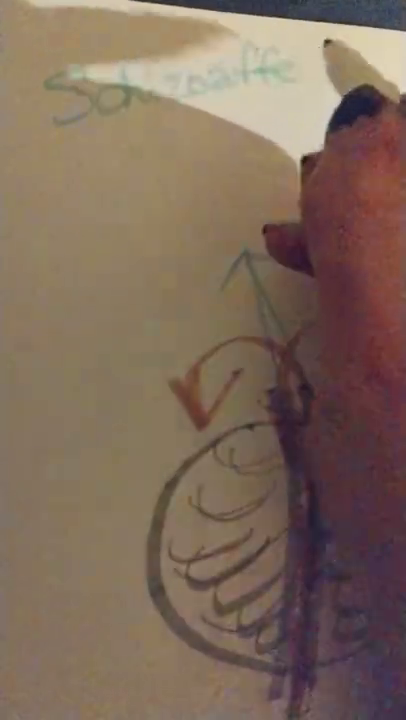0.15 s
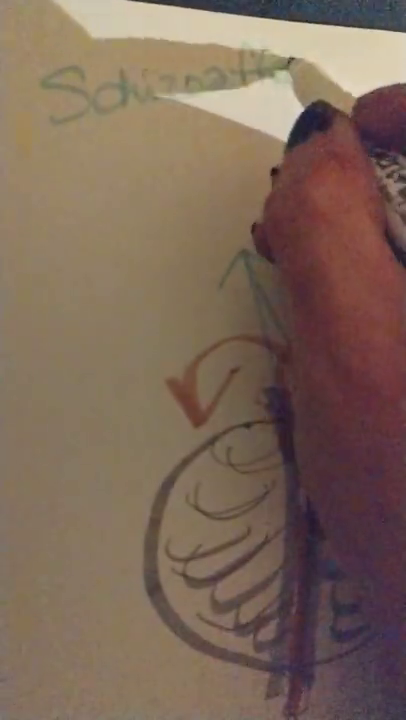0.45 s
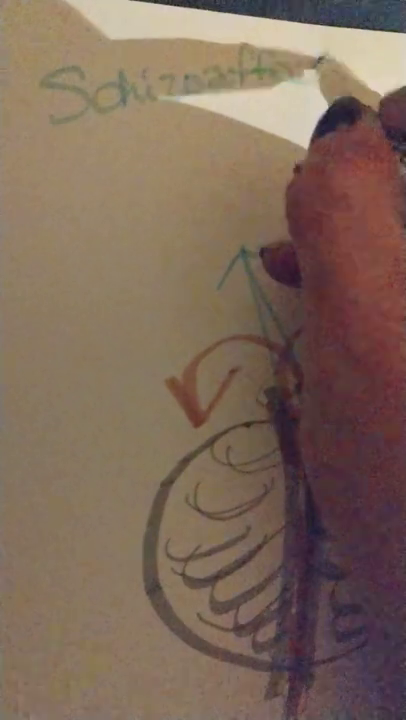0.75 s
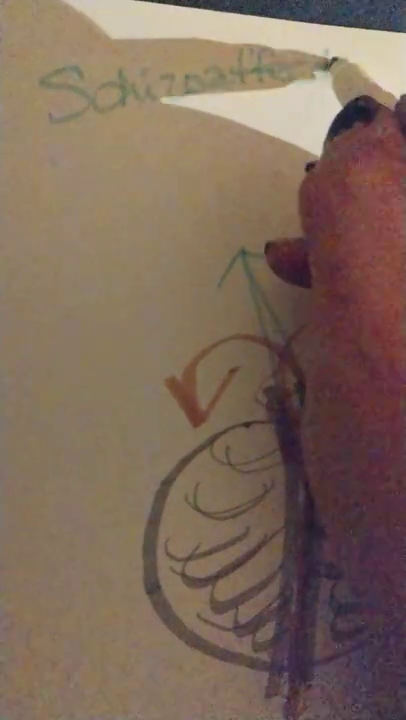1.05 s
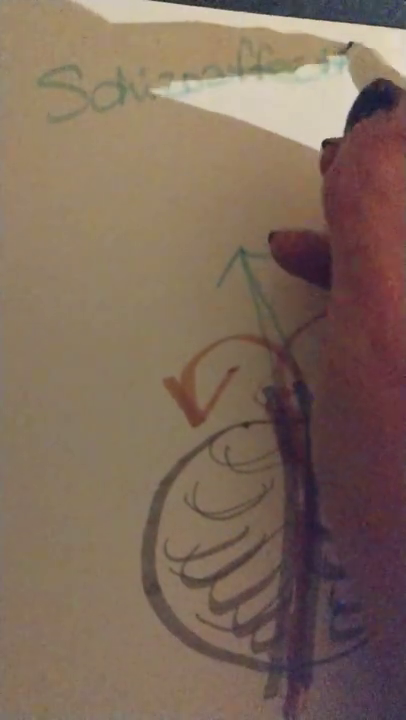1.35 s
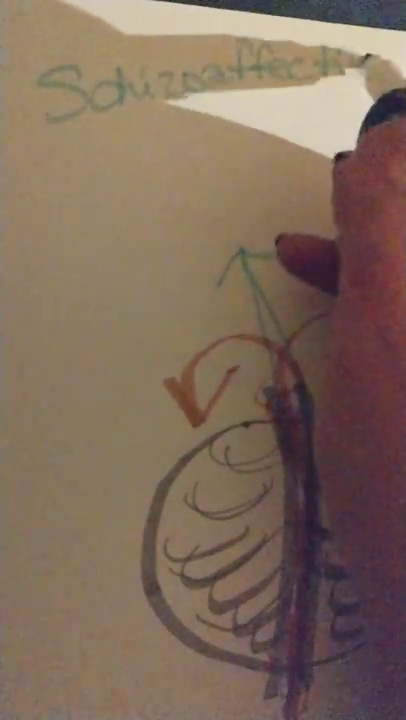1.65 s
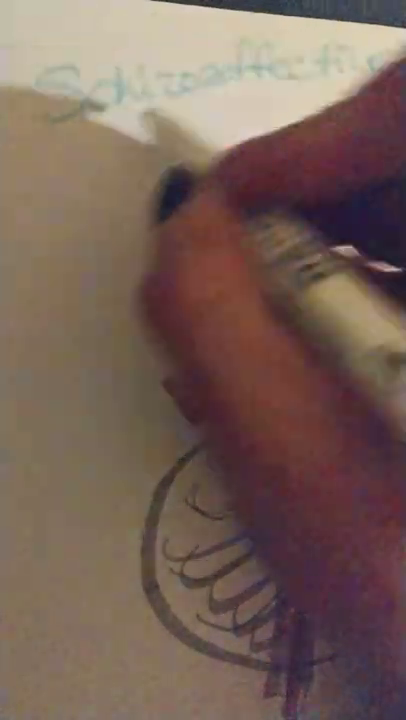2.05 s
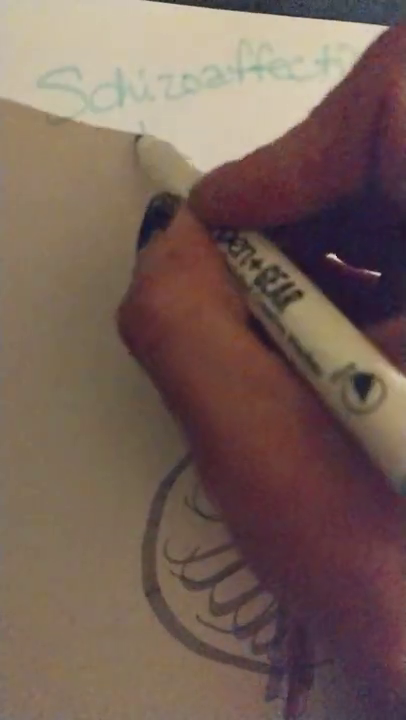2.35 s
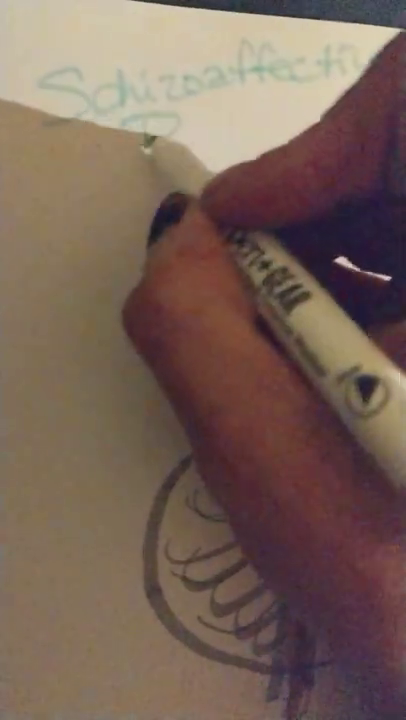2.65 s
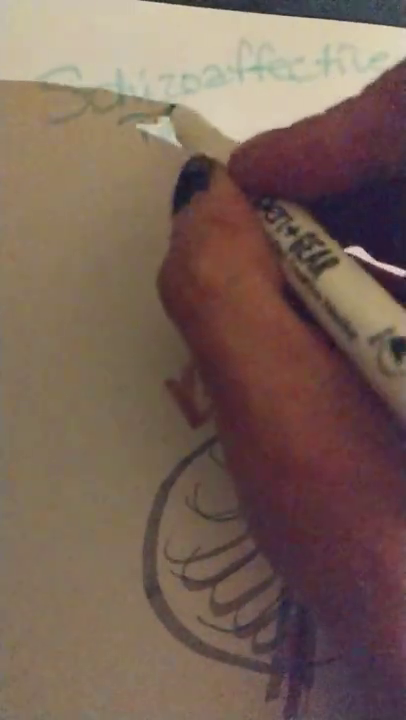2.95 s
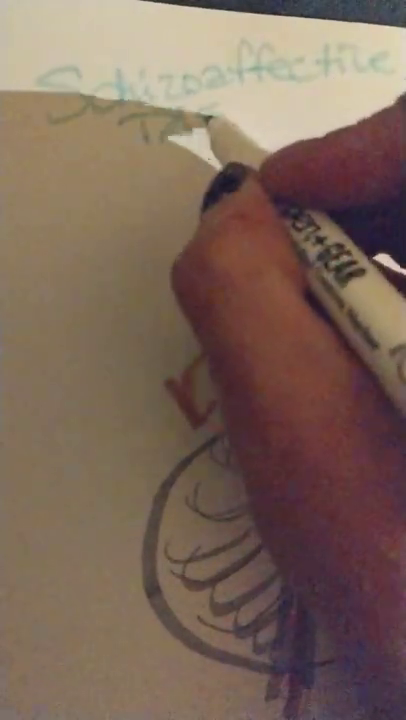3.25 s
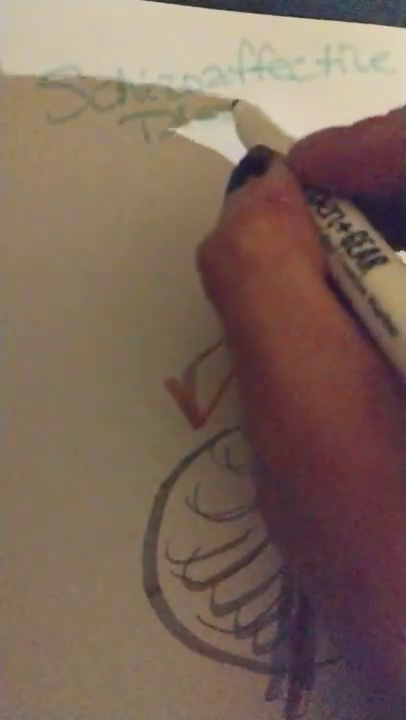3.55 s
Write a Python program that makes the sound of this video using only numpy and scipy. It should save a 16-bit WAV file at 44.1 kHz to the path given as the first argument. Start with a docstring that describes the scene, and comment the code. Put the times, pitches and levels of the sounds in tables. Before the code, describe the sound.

A felt marker writes on paper in quick, high, scratchy strokes.

```python
"""Short, high scratches come first: a felt marker writes letters on paper on a desk, close on the left.
In each stroke the nib catches and slips on the fibres, faster and harder in mid-stroke; the scratch
peaks near 9 kHz. Now and then the nib snags with a click or squeaks faintly. Between strokes come
a faint smooth sliding and a few soft bumps on the desk, over a quiet humming room."""
import sys
import numpy as np
from scipy import signal
from scipy.fft import rfft, irfft
from scipy.io import wavfile

SR = 44100
rng = np.random.default_rng(int(sys.argv[2]) if len(sys.argv) > 2 else 0)


def transcribe(signal):
    """Save signal, clipped to [-1, 1], as a 16-bit WAV file at the path in sys.argv[1]."""
    frames = np.atleast_2d(signal).T
    limited = np.clip(frames, -1, 1)
    pcm = np.round(limited * 32767).astype(np.int16)
    wavfile.write(sys.argv[1], SR, pcm)


N = 163170
COLOUR_HZ = np.fft.rfftfreq(1024, 1 / SR)  # the frequencies at which a tone colour is set
NIB_DB, NIB_WIDTH_HZ = 5.5, 340  # height and half-width of the peak where the nib rings
SLIPS_PER_S, SLIP_SPREAD_DB, SLIP_DECAY_S = 1300, 2.5, 0.00052

# The tone colour of the scratch. Each row: frequency in Hz, relative left and right levels in dB.
SCRATCH_COLOUR = [(304, -61, -46), (1510, -31.5, -38.5), (2550, -35.5, -34.5), (3280, -28.5, -34),
                  (3920, -27.5, -29), (5640, -29.5, -34), (6210, -12.5, -26), (6500, -12.5, -20.5),
                  (7420, -8, -24), (8100, -3.5, -25), (8540, 1, -20.5), (9200, 2, -26), (10070, 1, -37),
                  (10320, -6, -26), (10900, -2.5, -32), (11490, -8, -50), (12340, -14, -40),
                  (13600, -21.5, -42), (15800, -39.5, -46.5)]
# The pen strokes. Each row: time of top speed, time speeding up and time slowing down in seconds,
# level in dB, nib pitch in Hz, extra ring in dB, brightness in dB per octave, right-side boost in dB.
PEN_STROKES = [(0.001, 0.01, 0.029, -49, 9160.0, -9, 0.5, 7), (0.11, 0.064, 0.019, -35.5, 9400, 0, 2, 1.5),
               (0.219, 0.074, 0.071, -48.0, 9400, -5, 4, 7),
               (0.451, 0.0096, 0.021, -59.5, 9260.0, -2.0, -1, 6),
               (0.546, 0.011, 0.03, -38.0, 9250.0, 0, -1, 4),
               (0.655, 0.039, 0.062, -32.0, 9440, -0.5, 2.5, 2),
               (0.752, 0.014, 0.029, -46.5, 9600, -1, 1, 1),
               (0.943, 0.015, 0.03, -57, 9450.0, -3, -1, -0.8),
               (0.977, 0.012, 0.031, -53.5, 9450.0, -5, -2, -0.3),
               (1.066, 0.021, 0.014, -37.0, 9100, 3, -1.0, 3),
               (1.087, 0.013, 0.035, -37.0, 9240, 0.0, 0, 4.5),
               (1.34, 0.011, 0.028, -46.5, 9400.0, -3.0, 7, -0.1),
               (1.403, 0.015, 0.048, -41.0, 9700, 1.0, 4, 2), (1.603, 0.041, 0.019, -43, 9500, 3, -4, 2),
               (1.766, 0.026, 0.035, -38.5, 9100, 3, 2, 2.5),
               (1.845, 0.0094, 0.032, -35, 9240, -3.5, 0, -1),
               (1.94, 0.039, 0.044, -33, 9300, -1.5, 0.3, -1.5),
               (2.469, 0.013, 0.013, -61.0, 8960.0, 2.0, 0.4, -1.9),
               (2.542, 0.005, 0.019, -43, 8580, 5, -8, -1.9),
               (2.596, 0.013, 0.032, -28.5, 8760, 7.5, -0.5, 4),
               (2.624, 0.032, 0.069, -27.5, 8930, 2, 1.5, 2),
               (2.732, 0.055, 0.037, -41.5, 9400, -8, -3, 4.5),
               (2.824, 0.053, 0.038, -40, 9220, -6, 0.0, 4.5),
               (2.983, 0.021, 0.0096, -52.5, 9220.0, 3, -8, 6),
               (3.073, 0.014, 0.012, -46, 8600, 3.5, -8, -3.7),
               (3.109, 0.0097, 0.012, -43.5, 9440.0, 4, -3.0, 2),
               (3.222, 0.031, 0.031, -31.0, 8800, 0.5, -1, 0),
               (3.313, 0.041, 0.034, -37.5, 9140.0, 0, -3, 3),
               (3.394, 0.025, 0.019, -33.5, 8760, -1.0, -4, 1),
               (3.496, 0.033, 0.013, -46.5, 9130.0, -10, -1.5, 5),
               (3.61, 0.029, 0.05, -37.5, 8860.0, 2.5, -3.5, 4),
               (3.697, 0.028, 0.03, -33.5, 9310.0, 1.5, -4.5, -1.6)]


def stroke(rise, fall, level_db, nib_hz, ring_db, brightness_db, right_db):
    """Uneven slips, each a tiny burst, and a smooth rub make the nib and paper ring."""
    speed = speed_arch(rise, fall)
    n = len(speed)
    chance = rng.random(SR // 2)[:n]
    size, noise = rng.standard_normal((2, SR // 2))[:, :n]
    slips = chance < SLIPS_PER_S * (0.44 + 0.56 * speed) / SR  # a faster nib slips more often
    sizes = amp(SLIP_SPREAD_DB * np.clip(size, -2, 2))
    slip_power = signal.lfilter([1], [1, -np.exp(-2 / (SLIP_DECAY_S * SR))], slips * sizes ** 2)
    rub_power = amp(3) ** 2
    grain = np.sqrt(unit(np.sqrt(slip_power)) ** 2 + rub_power) * noise
    force = speed ** 1.79
    drive = unit(grain * force) * np.sqrt(np.mean(force ** 2))
    nib = nib_peak(nib_hz, NIB_DB + ring_db)
    # Reflections off the desk and hand colour each stroke differently, left and right.
    ripple = np.array([db * wander(len(COLOUR_HZ), 202 / COLOUR_HZ[1]) for db in (2.3, 3)])
    tilt = brightness_db * np.log2(np.maximum(COLOUR_HZ / nib_hz, .5))
    colour = read(SCRATCH_COLOUR, COLOUR_HZ) + nib + tilt + ripple
    return amp([[level_db], [level_db + right_db]]) * ring(drive, colour)


# The nib's snags. Each row: start in seconds, level in dB.
NIB_SNAGS = [(0.6408, -15), (0.6612, -10), (2.6308, -16), (2.6349, -20), (3.3960, -14), (3.4152, -18.5)]


def snag(level_db):
    """The nib catches on a fibre and snaps free: one click, ringing more than the scratch."""
    return ring(amp([level_db]), read(SCRATCH_COLOUR, COLOUR_HZ) + nib_peak(9000, height_db=15))


# The tone colour of the sliding. Each row: frequency in Hz, relative left and right levels in dB.
SLIDE_COLOUR = [(500, -30, -13), (2340, -24, -28), (4100, -29, -26.5), (5770, -21.5, -32),
                (6260, -14.5, -20), (7700, -7, -19), (9000, 0.5, -22), (10100, -3, -29), (10200, -4.5, -22),
                (11200, -9.5, -29), (12400, -10, -31), (13500, -17.5, -46), (15900, -31, -40)]
# The slides. Each row: time of top speed, time speeding up and time slowing down in seconds, level in dB.
PAPER_SLIDES = [(0.049, 0.035, .1, -59), (0.604, .05, 0.071, -55.5), (0.839, 0.032, 0.067, -56.5),
                (1.151, 0.022, 0.082, -60.5), (1.532, .108, 0.12, -59.5), (1.647, 0.026, 0.051, -55),
                (1.85, .068, 0.13, -58.5), (2.026, 0.051, .095, -61), (2.151, .092, 0.034, -57.5),
                (2.355, .017, 0.063, -58), (2.887, .013, 0.066, -58), (3.451, 0.023, 0.022, -56.5),
                (3.549, .036, 0.078, -62), (3.661, .06, 0.035, -51)]


def slide(rise, fall, level_db):
    """Light rubbing over the sheet makes a fine hiss that grows with speed."""
    speed = speed_arch(rise, fall)
    grain = unit(rng.standard_normal(SR) * amp(1.5 * wander(SR, 25)))[:len(speed)]
    return amp(level_db) * ring(grain * speed ** 0.68, read(SLIDE_COLOUR, COLOUR_HZ))


# Soft bumps of hand and pen. Each row: start in seconds, peak level in dB.
DESK_BUMPS = [(1.778, -54), (1.809, -53.5), (1.913, -53), (2.237, -52), (2.318, -49), (2.340, -58),
              (3.064, -47)]


def bump(level_db, pitch_hz=138, rise_s=0.0011, decay_s=0.004):
    """The desk top swings once and settles almost at once."""
    t = np.arange(SR // 20) / SR
    swing = (1 - np.exp(-t / rise_s)) * np.exp(-t / decay_s) * np.sin(2 * np.pi * pitch_hz * t)
    return -amp(level_db) * swing / abs(swing).max()


# The faint squeaks. Each row: start in seconds, length in seconds, pitch in Hz, level in dB.
NIB_SQUEAKS = [(2.278, 0.062, 5900, -75), (2.69, 0.26, 4560, -73)]


def squeak(length, pitch_hz, level_db, waver_hz=90):
    """Slips fall roughly into step for a moment and give a thin, broken tone."""
    swell = speed_arch(length / 2, length / 2)
    drift, grip = (wander(SR, 120)[:len(swell)] for _ in range(2))
    phase = 2 * np.pi * np.cumsum(pitch_hz + waver_hz * drift) / SR
    return amp(level_db) * swell * grip * np.sin(phase)


def room_echo(sound, fade_s=0.13):
    """The small room answers the left channel with a short, faint echo on both sides."""
    t = np.arange(SR // 3) / SR
    tail = rng.standard_normal((2, len(t))) * amp(-60 * t / fade_s) * (t > .002)
    tail = tail / np.linalg.norm(tail[0]) * amp([[-22], [-40]])
    return signal.fftconvolve(sound[:1], tail, axes=1)[:, :N]


# The steady noise. Each row: frequency in Hz, left and right levels in dB per Hz.
NOISE_COLOUR = [(20.4, -118, -118), (45, -102, -89), (71, -95.5, -101), (87.7, -86, -86),
                (123, -85.5, -86.5), (202, -88.5, -87.5), (281, -95, -92.5), (389, -98.5, -91),
                (510, -99, -98.5), (1100, -101, -102), (1670, -107, -108), (1960, -109, -109),
                (2270, -105, -105), (2900, -112, -112), (4200, -112, -112), (4810, -104, -104),
                (5100, -104, -105), (6080, -112, -112), (7560, -108, -113), (8940, -100, -114),
                (9900, -100, -115), (10740, -111, -117), (13100, -117, -119), (15500, -122, -123)]
# How alike its two sides are. Each row: frequency in Hz, likeness (1 the same, 0 unrelated, -1 opposite).
NOISE_LIKENESS = [(60, 0.72), (150, 1), (290, 0.64), (640, -0.25), (1400, -0.36), (3100, 0.33),
                  (15000, -0.3)]


def room_noise():
    """Room rumble, mostly shared by both sides, and microphone hiss, mostly separate."""
    hz = np.fft.rfftfreq(N, 1 / SR)
    left, separate = rfft(rng.standard_normal((2, N)))
    likeness = read(NOISE_LIKENESS, hz)[0]
    right = likeness * left + np.sqrt(1 - likeness ** 2) * separate
    return irfft(np.array([left, right]) * amp(read(NOISE_COLOUR, hz)), N) * np.sqrt(SR / 2)


# The room's hum. Each row: pitch in Hz, left and right levels in dB.
HUM_TONES = [(99.6, -69.5, -69.5), (357.8, -89, -69.5)]


def hum(waver=0.49, waver_hz=8.5):
    """Two low tones waver in loudness and pitch."""
    t = np.arange(N) / SR
    tones = np.zeros((2, N))
    for hz, left_db, right_db in HUM_TONES:
        swell, drift = (waver * wander(N, SR / waver_hz / 2) for _ in range(2))
        tone = unit((1 + swell) * np.sin(2 * np.pi * hz * t + 2 * drift))
        tones += amp([[left_db], [right_db]]) * tone
    return tones


# The path of a thin hiss. Each row: time in seconds, centre pitch in Hz, level in dB.
HISS_PATH = [(0, 5280, -76), (1.301, 5316, -74.5), (1.9, 5250, -71), (2.302, 5180, -76), (3.7, 5180, -74)]


def thin_hiss(width_hz=530):
    """A narrow band of noise, different on each side, drifts slowly in pitch."""
    times, centre_hz, level_db = np.transpose(HISS_PATH)
    t = np.arange(N) / SR
    carrier = np.exp(2j * np.pi * np.cumsum(np.interp(t, times, centre_hz)) / SR)
    band = np.exp(-(2 * np.fft.fftfreq(N, 1 / SR) / width_hz) ** 2 / 2)
    white = rng.standard_normal((2, N)) + 1j * rng.standard_normal((2, N))
    low_noise = np.fft.ifft(np.fft.fft(white) * band)
    return amp(np.interp(t, times, level_db)) * unit((low_noise * carrier).real)


def speed_arch(rise, fall):
    """The speed of one movement: from rest up to 1 and back."""
    t = np.arange(0, rise + fall, 1 / SR)
    return abs(np.sin(np.pi * np.interp(t, [0, rise, rise + fall], [0, .5, 1])))


def nib_peak(pitch_hz, height_db):
    """The boost in dB around the pitch at which the nib rings."""
    return height_db / (1 + ((COLOUR_HZ - pitch_hz) / NIB_WIDTH_HZ) ** 2)


def ring(drive, colour_db):
    """Gives a sound a left and a right tone colour; white noise keeps its power on the left."""
    log_gain = np.log(amp(colour_db))
    mirrored = np.concatenate([log_gain, log_gain[:, -2:0:-1]], 1)
    response = np.exp(np.conj(signal.hilbert(mirrored, axis=1)))  # rings after each push, never before
    taps = np.fft.ifft(response, axis=1).real
    return signal.fftconvolve(drive[None], taps / np.linalg.norm(taps[0]), axes=1)


def wander(count, span):
    """A smooth random curve of typical size 1 that changes over about span points."""
    soft = np.exp(-(np.fft.rfftfreq(count) * span * 2) ** 2)
    return unit(irfft(rfft(rng.standard_normal(count)) * soft, count))


def amp(db):
    """Turns decibels into a multiplier."""
    return 10 ** (np.asarray(db) / 20)


def unit(x):
    """Scales a signal to a typical size (rms) of 1."""
    return x / np.sqrt(np.mean(abs(x) ** 2) + 1e-20)


def read(table, hz):
    """Fills in between a table's rows at the given frequencies."""
    row_hz, *columns = np.transpose(table)
    return np.array([np.interp(np.log(hz + 1), np.log(row_hz + 1), c) for c in columns])


def add(mix, start_s, sound):
    """Mixes a sound in, trimming whatever falls outside the mix."""
    at = round(start_s * SR)
    sound = sound[..., max(-at, 0):]
    part = mix[:, max(at, 0):][:, :sound.shape[-1]]
    part += sound[..., :part.shape[1]]


def scene():
    """Strokes, sliding, snags, squeaks and bumps in the quiet room."""
    background = room_noise() + hum() + thin_hiss()
    desk = np.zeros((2, N))
    for fastest_s, rise, *rest in PEN_STROKES:
        add(desk, fastest_s - rise, stroke(rise, *rest))
    for fastest_s, rise, *rest in PAPER_SLIDES:
        add(desk, fastest_s - rise, slide(rise, *rest))
    for start_s, level_db in NIB_SNAGS:
        add(desk, start_s, snag(level_db))
    for start_s, *rest in NIB_SQUEAKS:
        add(desk, start_s, squeak(*rest))
    for start_s, level_db in DESK_BUMPS:
        add(desk, start_s, bump(level_db))
    return desk + room_echo(desk) + background


def record(dry):
    """Cuts the highest treble, above 15.8 kHz."""
    low_pass = signal.firwin(511, 15800, window=("kaiser", 9), fs=SR)
    return signal.oaconvolve(dry, low_pass[None], "same")


dry = scene()
out = record(dry)
transcribe(out)
```